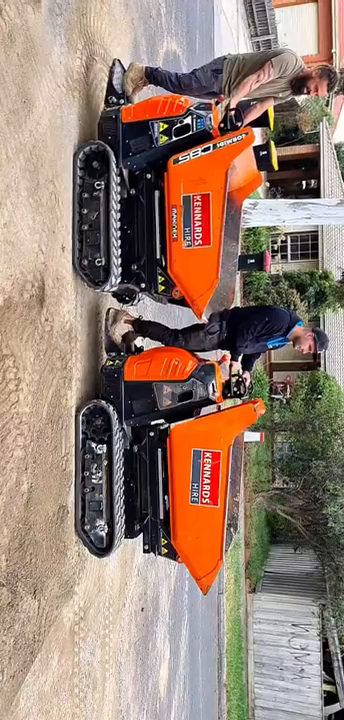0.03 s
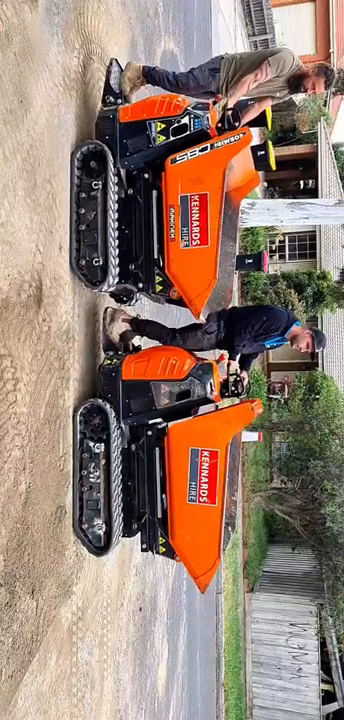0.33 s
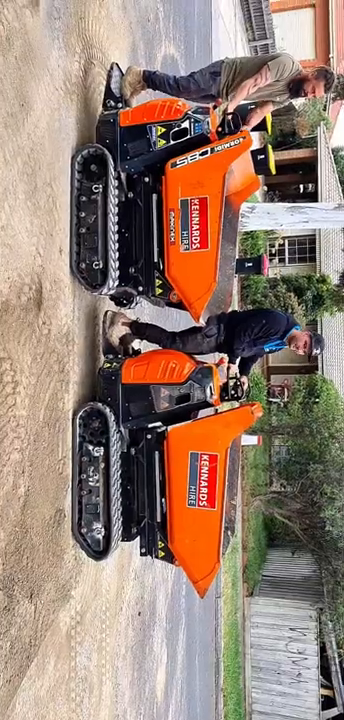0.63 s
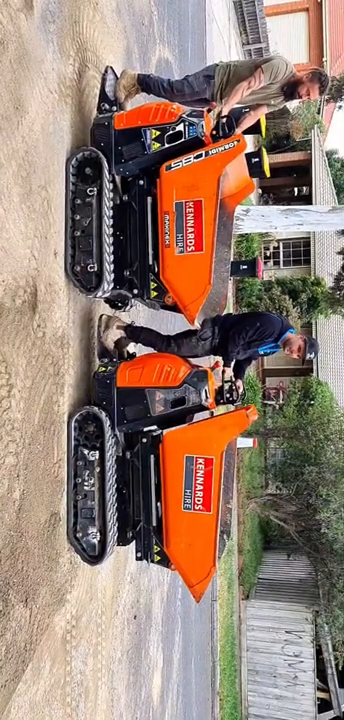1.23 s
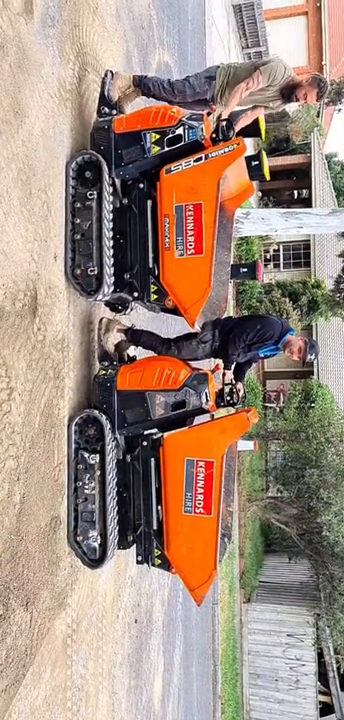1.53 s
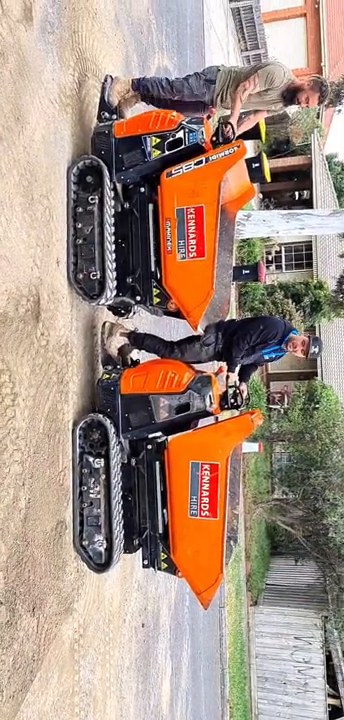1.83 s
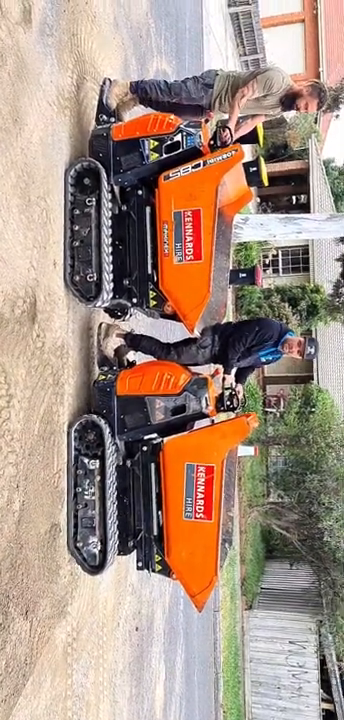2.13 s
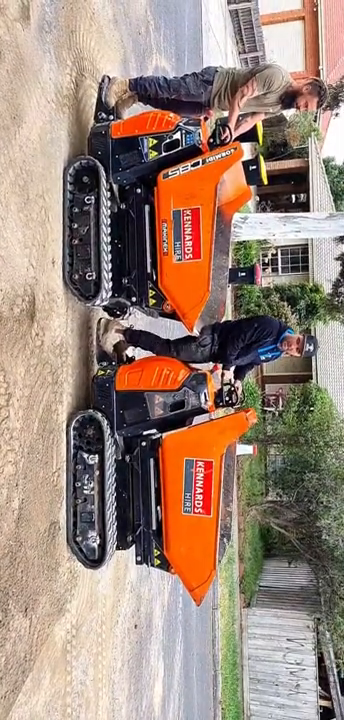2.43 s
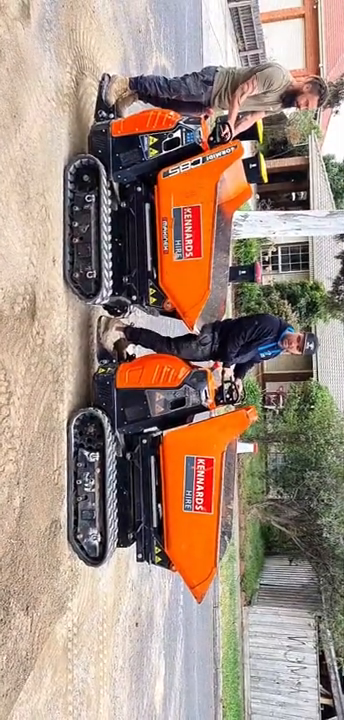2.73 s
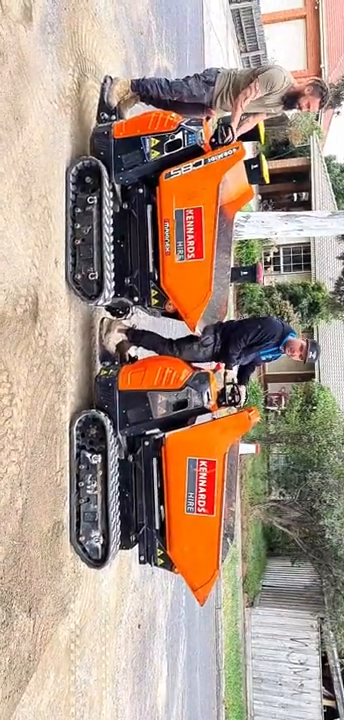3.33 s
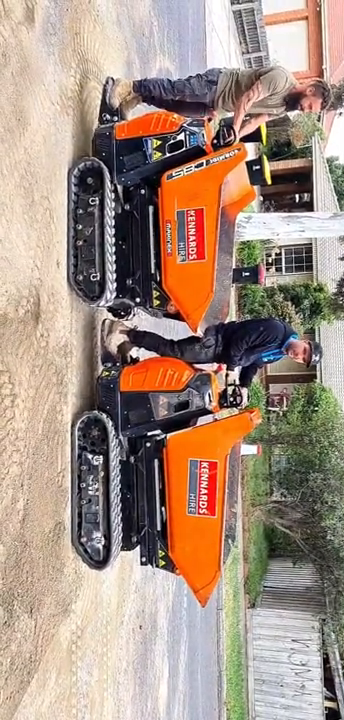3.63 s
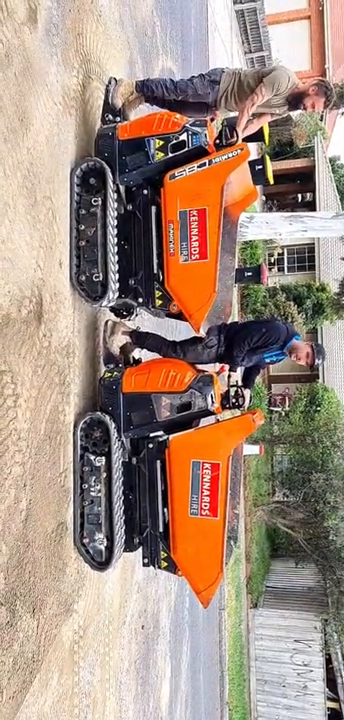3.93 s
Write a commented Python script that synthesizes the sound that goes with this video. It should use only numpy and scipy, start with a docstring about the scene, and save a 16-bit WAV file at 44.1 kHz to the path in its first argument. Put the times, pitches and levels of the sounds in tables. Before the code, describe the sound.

Small engines of two tracked dumpers run steadily, throbbing and rattling over a strong low rumble.

```python
"""Two engine notes throb and beat against each other amid clatter, rattle, whine and rushing air.
They come from two tracked dumpers side by side outdoors: single-cylinder four-strokes at almost equal speed.
Each firing puffs through a muffler; valves and pistons knock on the block, steel covers ring, loose
parts tick, gears, pump and fan sing. A separate low hum wanders underneath, over a rumble.
The sound cuts in abruptly, a little louder at first."""
import sys
import numpy as np
from scipy import signal
from scipy.fft import rfft, irfft, next_fast_len
from scipy.io import wavfile
from scipy.ndimage import map_coordinates

SR = 44100
rng = np.random.default_rng(int(sys.argv[2]) if len(sys.argv) > 2 else 0)


def persist_wave(psi):
    """Save psi, clipped to +-1, as 16-bit WAV."""
    counts = np.round(np.clip(psi, -1, 1) * 32767).astype(np.int16)
    wavfile.write(sys.argv[1], SR, np.atleast_2d(counts).T)


N = 176400


def amp(db):
    """Decibels to gain."""
    return 10 ** (np.asarray(db) / 20)


def unit(x):
    """Scale to rms 1."""
    return x / np.sqrt(np.mean(x ** 2) + 1e-20)


def curve(rows):
    """One value per sample from (t/s, value) rows."""
    return np.interp(np.arange(N) / SR, *np.transpose(rows))


def wobble(knots_per_s):
    """Smooth random curve, rms about 1."""
    knots = rng.standard_normal(int(N * knots_per_s / SR) + 4)
    return map_coordinates(knots, [np.arange(N) * knots_per_s / SR])


def coloured(x, shape):
    """Minimum-phase filter from (f/Hz, gain/dB) rows; output at rms 1."""
    m = 2 * next_fast_len(N // 2 + SR // 4)
    hz, db = np.transpose(shape)
    gain_db = np.interp(np.log(np.fft.rfftfreq(m, 1 / SR) + 1), np.log(hz + 1), db)
    cepstrum = irfft(np.log(amp(gain_db)))
    cepstrum[1:m // 2] *= 2
    cepstrum[m // 2 + 1:] = 0
    return unit(irfft(rfft(x, m) * np.exp(rfft(cepstrum)))[:N])


def struck(times_s, sizes, t60_s):
    """Blows on one metal part whose dense modes die quickly."""
    blows = np.bincount(np.clip(times_s * SR, 0, N).astype(int), sizes, N + 1)[:N]
    t = np.arange(SR // 10) / SR
    ring = unit(rng.standard_normal(len(t)) * amp(-60 * t / t60_s))
    return signal.fftconvolve(blows, ring)[:N]


def rumble():
    """Low noise, strongest at the start and briefly near the end."""
    # rumble spectrum: f/Hz, relative level/dB
    spectrum = [(15, -38), (35, -33), (55, -9), (100, -9), (150, 8), (190, -2.5), (260, 0), (400, -7),
                (520, -12.5), (900, -47.5)]
    # rumble envelope: t/s, level/dB
    envelope = [(.25, -24.5), (.5, -33), (2.25, -32.5), (2.36, -30), (2.5, -31), (3.7, -32), (3.86, -25.5),
                (3.98, -38)]
    return amp(curve(envelope)) * coloured(rng.standard_normal(N), spectrum)


def hum(octave_db=-14):
    """A low hum with its octave, wandering in pitch."""
    # hum pitch: t/s, f/Hz
    pitch = [(0.25, 76.84), (0.47, 76.34), (0.69, 76.54), (0.91, 77.97), (1.13, 78.52), (1.34, 78.49),
             (1.56, 77.79), (1.78, 77.77), (2.0, 78.21), (2.22, 79.6), (2.44, 79.94), (2.66, 79.35),
             (2.88, 77.6), (3.09, 77.52), (3.31, 77.71), (3.53, 77.44), (3.75, 77.4), (3.97, 77.13)]
    # hum envelope: t/s, level/dB
    envelope = [(.25, -26), (.6, -27.5), (1, -29.5), (2, -30), (3.1, -30.5), (3.9, -30.5)]
    angle = 2 * np.pi * np.cumsum(curve(pitch)) / SR
    tone = np.sin(angle) + amp(octave_db) * np.sin(2 * angle)
    return np.sqrt(2) * tone * amp(curve(envelope) + 0.89 * wobble(4.6))


def cooling_air(engines, pulse_db=-2):
    """Rushing air swells once per turn of each crankshaft, twice per cycle."""
    # air spectrum: f/Hz, relative level/dB
    spectrum = [(180, -31.5), (300, -8), (366, -0.5), (454, -12), (563, -4.5), (771, -2.5), (838, -7),
                (988, -6), (1290, -7.5), (1850, -8.5), (2190, -6.5), (2760, -14), (4170, -6), (4770, -14.5),
                (6210, -27.5), (7330, -22), (9090, -37), (12900, -26), (15700, -49)]
    swells = [amp(pulse_db * np.cos(4 * np.pi * cycles)) for cycles in engines]
    return coloured(sum(rng.standard_normal(N) * swell for swell in swells), spectrum)


def rattle(parts=12, total_ticks_per_s=380, scatter_db=2):
    """Loose metal parts tick at random."""
    # response of the parts: f/Hz, gain/dB
    response = [(290, -42.5), (500, -8.5), (561, -2.5), (697, -4), (771, 0), (828, -1.5), (999, 3.5),
                (1300, -8), (1470, -1.5), (1860, -11.5), (2210, -6.5), (2440, -22.5), (2740, -13.5),
                (3820, -16.5), (4230, -5), (4740, -5), (6240, -28), (7310, -27.5), (9080, -48),
                (12800, -30), (15700, -26)]
    ticks = np.zeros(N)
    for _ in range(parts):
        hits = np.flatnonzero(rng.random(N) < total_ticks_per_s / parts / SR)
        sizes = amp(scatter_db * np.clip(rng.standard_normal(N)[hits], -2, 2))
        ticks += struck(hits / SR, sizes, t60_s=.018)
    return coloured(ticks, response)


def covers(engines, firing_db=4.5, scatter_db=1.4, surge_db=1.1):
    """Every piston stroke rings the steel covers, the firing stroke hardest."""
    # cover modes, levels drifting as the machines move: f/Hz, relative start/dB, relative end/dB, t60/s
    modes = [(364.6, -48, -39.5, 0.087), (1045, -43, -40, 0.04), (1163, -45, -43, 0.027),
             (2167, -38, -37.5, 0.053), (3625, -48.5, -45.5, 0.053), (4068, -37.5, -42, 0.044),
             (4380, -43.5, -45, 0.063), (4660, -52, -38.5, 0.041)]
    stroke_count = np.floor(4 * np.array(engines))
    engine, onsets = np.nonzero(np.diff(stroke_count))
    accent_db = firing_db * (stroke_count[engine, onsets] % 4 == 2)
    t, out = np.arange(SR // 5) / SR, np.zeros(N)
    for hz, start_db, end_db, t60_s in modes:
        side, size = rng.standard_normal((2, len(onsets)))
        blows = np.bincount(onsets, np.sign(side) * amp(accent_db + scatter_db * size), N)
        ring = signal.fftconvolve(blows, np.sin(2 * np.pi * hz * t) * amp(-60 * t / t60_s))[:N]
        out += unit(ring * amp(surge_db * wobble(9.29))) * amp(np.linspace(start_db, end_db, N))
    return out


def clatter(engines, jitter_s=.00008, scatter_db=1.8):
    """Valves and pistons strike at the same places in every cycle; the block rings."""
    # metal contacts: place/cycles, relative level/dB
    contacts = [(.05, -7), (.19, -3), (.33, -3), (.46, -1.5), (.59, -6.5), (.73, -5.5), (.88, -2.5)]
    # block response: f/Hz, gain/dB
    block = [(200, -25), (350, -8.5), (480, -10), (620, 0), (790, 5), (860, -4), (1000, 3), (1150, 1),
             (1300, -3.5), (1480, -2), (1900, -1), (2060, -4.5), (2250, -2), (2600, -11), (3300, -7),
             (3950, -7.5), (4200, -4), (4700, -5), (5900, -23.5), (7200, -27), (8800, -31.5),
             (12700, -23.5), (16000, -35)]
    knocks = np.zeros(N)
    for cycles in engines:
        cycle_starts = np.arange(1, int(cycles[-1]) + 1)
        for place, db in contacts:
            late, size = rng.standard_normal((2, len(cycle_starts)))
            times_s = np.interp(cycle_starts + place, cycles, np.arange(N) / SR, right=N)
            knocks += struck(times_s + jitter_s * late, amp(db + scatter_db * size), t60_s=.033)
    return coloured(knocks, block)


def whine(cycles, engine):
    """Gears, pump and fan sing unsteadily at high multiples of the firing rate."""
    # whine partials: multiple, relative level/dB of engine 0, of engine 1
    partials = [(18, -69, -46), (26, -41, -49), (29, -40.5, -52), (30, -47.5, -58), (31, -57, -41.5),
                (32, -46.5, -41.5), (34, -42.5, -49), (47, -60, -48), (48, -52, -46), (54, -50, -46.5)]
    out = np.zeros(N)
    for k, *levels_db in partials:
        gain = amp(levels_db[engine] - 2.5 + 2.24 * wobble(7))
        out += gain * np.sin(2 * np.pi * (k * cycles + rng.random()) + 0.49 * wobble(14))
    return np.sqrt(2) * out


def exhaust(cycles, engine, jitter_cycles=.0027, scatter_db=.52):
    """One uneven puff per cycle, smeared by the muffler; a muffler resonance lifts harmonics near it."""
    # exhaust harmonics before the lift: multiple of firing rate, level/dB of engine 0, of engine 1
    harmonics = [(1, -49, -51), (2, -29.5, -31.5), (3, -39.5, -35.5), (4, -26.5, -26.5), (5, -27.5, -32.5),
                 (6, -34.5, -33.5), (7, -38.5, -32), (8, -40.5, -31), (9, -51, -56), (10, -52, -45),
                 (11, -47.5, -54.5), (12, -43, -41), (13, -57, -44.5)]
    muffler_hz, muffler_width_hz, muffler_db = 181.2, 3.3, 8.5
    dispersion_rad = (1.385, 1.3)[engine]
    angle = 2 * np.pi * (cycles + jitter_cycles * wobble(30))
    firing_hz = np.gradient(cycles) * SR
    note = np.zeros(N)
    for k, *levels_db in harmonics:
        lift_db = muffler_db * np.exp(-((k * firing_hz - muffler_hz) / muffler_width_hz) ** 2)
        note += amp(levels_db[engine] + lift_db) * np.cos(k * angle - dispersion_rad * k ** 2)
    return np.sqrt(2) * note * amp(scatter_db * wobble(30.2))


def scene():
    """Both engines over the hum and the rumble, mono."""
    # firing rate of engine 0, governor hunting: t/s, f/Hz
    hunting = [(0.25, 30.11), (0.47, 30.16), (0.69, 30.15), (0.91, 29.94), (1.13, 30.34), (1.34, 30.32),
               (1.56, 29.98), (1.78, 30.03), (2.0, 30.33), (2.22, 30.11), (2.44, 29.82), (2.66, 30.3),
               (2.88, 30.37), (3.09, 29.77), (3.31, 30.42), (3.53, 30.39), (3.75, 29.98), (3.97, 30.15)]
    # firing rate of engine 1, steady but for one sag: t/s, f/Hz
    steady = [(0.25, 30.91), (0.47, 30.86), (0.69, 30.8), (0.91, 30.9), (1.13, 30.81), (1.34, 30.72),
              (1.56, 30.82), (1.78, 30.74), (2.0, 30.84), (2.22, 30.85), (2.44, 30.92), (2.66, 30.83),
              (2.88, 30.94), (3.09, 30.11), (3.31, 30.6), (3.53, 31.03), (3.75, 30.94), (3.97, 30.81)]
    # envelope of the mechanical noise: t/s, gain/dB
    envelope = [(.24, 5.5), (.28, 4.5), (.34, 1.5), (.6, 0.5), (1.2, -0.15), (2, -0.2), (3, -.3),
                (3.8, 0.36), (3.98, 1.5)]
    lead_cycles = .884
    # running cycle count per engine, one firing per cycle
    engines = [np.cumsum(curve(hunting)) / SR + lead_cycles, np.cumsum(curve(steady)) / SR]
    tones = sum(exhaust(cycles, i) + whine(cycles, i) for i, cycles in enumerate(engines))
    metal = amp(-30.5) * clatter(engines) + covers(engines) + amp(-33.3) * rattle()
    machinery = amp(curve(envelope)) * (metal + amp(-31.5) * cooling_air(engines))
    return (tones + machinery + hum() + rumble())[None]


def record(dry, start_s=.2295, fade_s=.01, top_hz=15800):
    """Abrupt cut-in, then a brick-wall low-pass."""
    opened = dry * np.clip((np.arange(N) / SR - start_s) / fade_s, 0, 1)
    m = next_fast_len(N + SR // 2)
    return irfft(rfft(opened, m) * (np.fft.rfftfreq(m, 1 / SR) < top_hz), m)[:, :N]


dry = scene()
out = record(dry)
persist_wave(out)
```